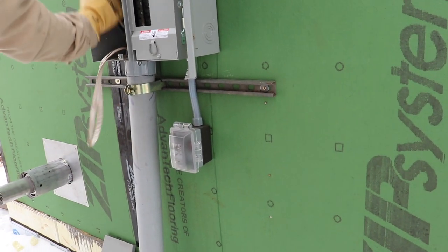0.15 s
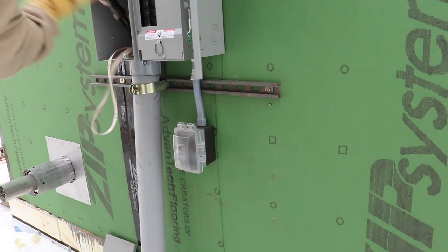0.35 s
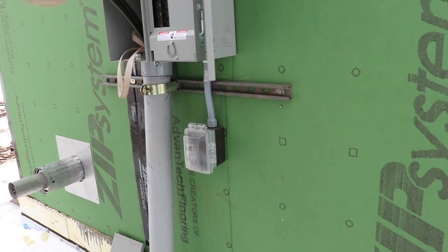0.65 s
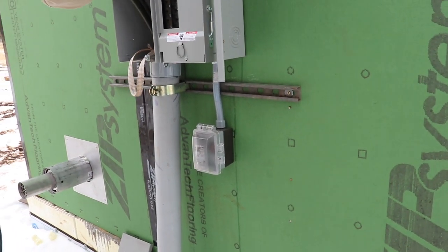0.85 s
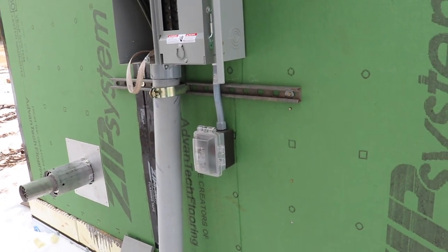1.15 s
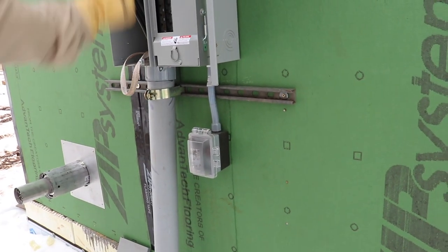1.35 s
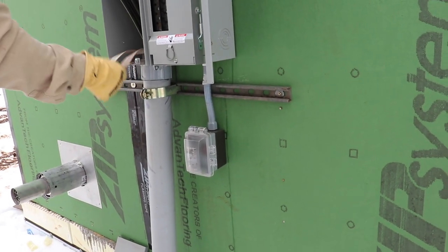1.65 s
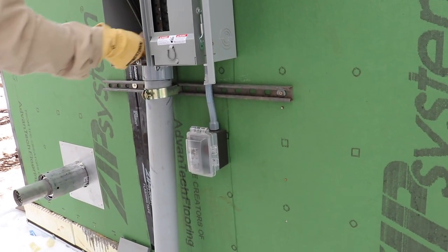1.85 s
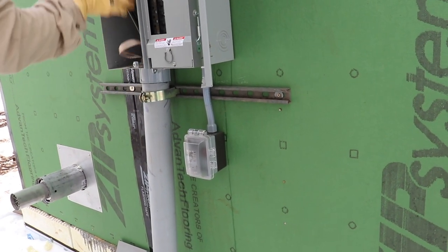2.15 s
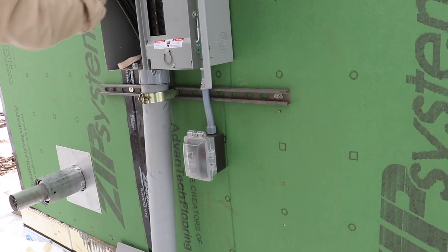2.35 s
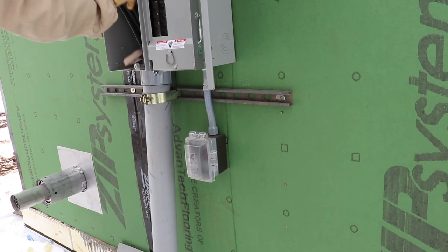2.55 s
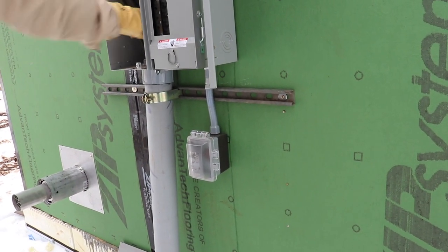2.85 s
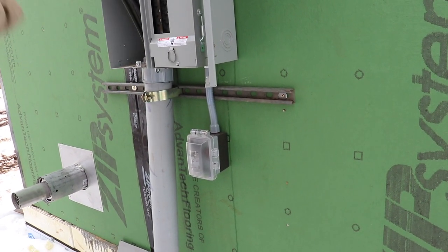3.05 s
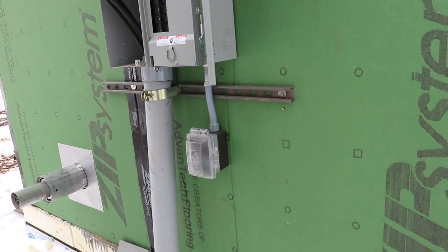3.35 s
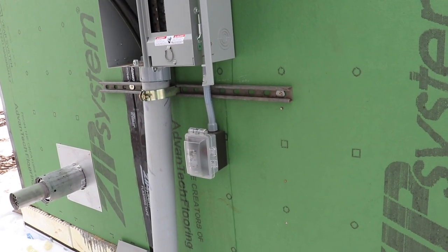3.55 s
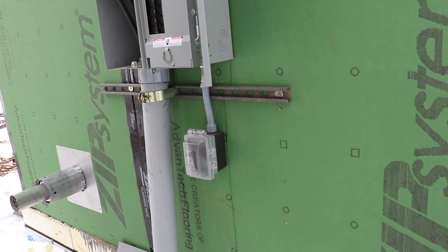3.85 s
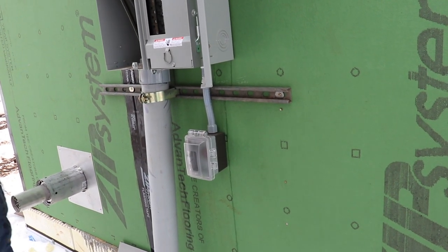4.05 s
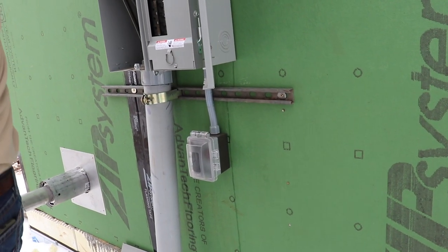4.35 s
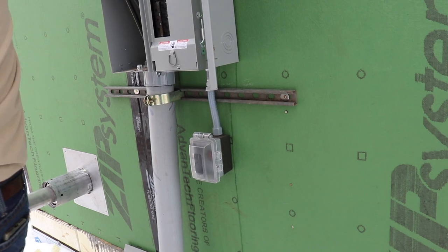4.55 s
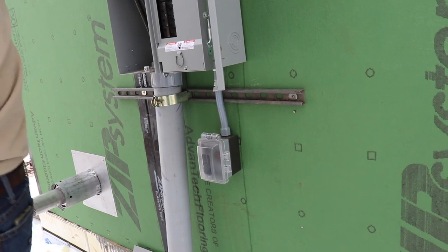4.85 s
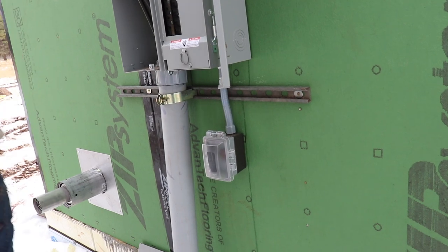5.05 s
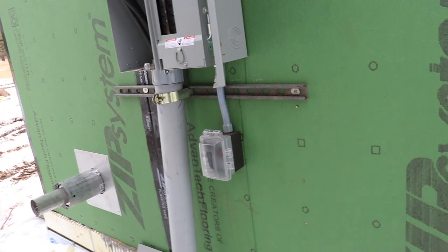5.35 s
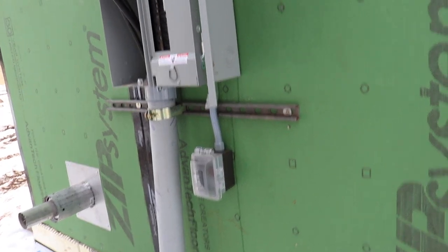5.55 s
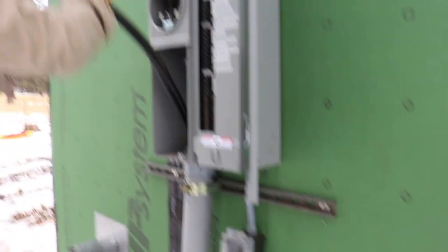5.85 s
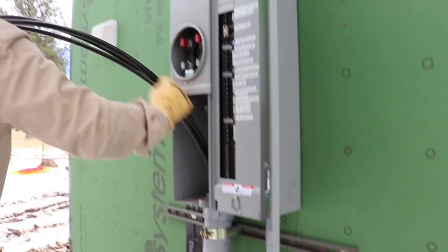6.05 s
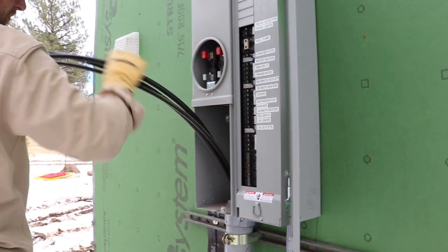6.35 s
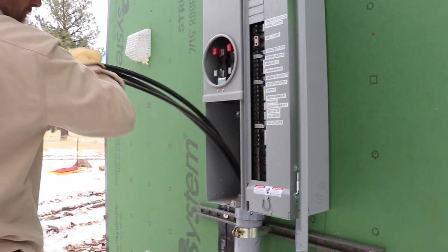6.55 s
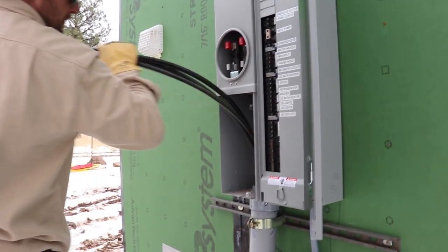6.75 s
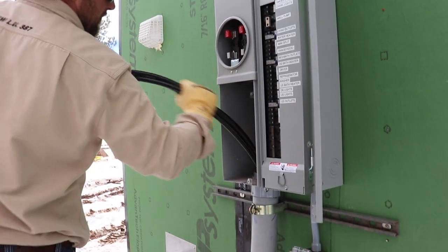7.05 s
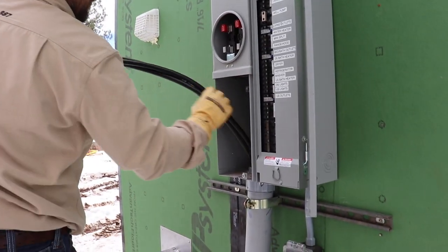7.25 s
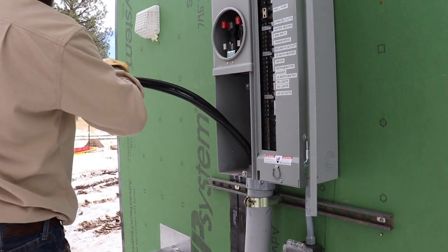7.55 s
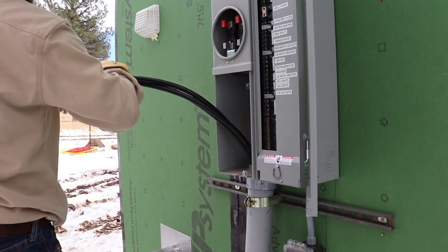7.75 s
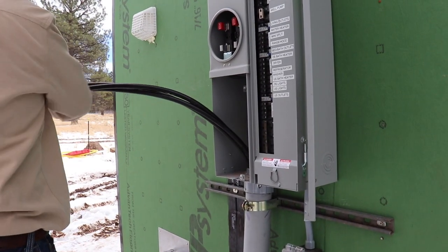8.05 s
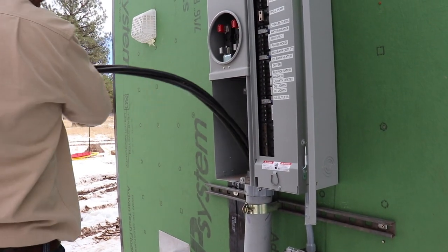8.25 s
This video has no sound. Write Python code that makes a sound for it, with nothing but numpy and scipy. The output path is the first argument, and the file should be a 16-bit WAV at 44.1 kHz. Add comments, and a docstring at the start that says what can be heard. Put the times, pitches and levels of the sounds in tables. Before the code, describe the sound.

Heavy rubbery cables rub inside a pipe and against a thin sheet-metal cabinet, giving gritty scrapes, low booming knocks and rattly, briefly ringing slaps. Activity comes in bursts: at the start, again after two seconds, a clank at four, muffled footsteps and ticks, then the densest pulling from about six seconds. One nearby microphone outdoors, faint wavering air behind.

```python
"""Outdoors at a steel meter box, one microphone: a worker draws thick cables up a conduit, hand over hand.
The cables judder and scrape in the pipe (trains of tiny friction slips), bump it and slap the box,
whose panels colour, echo and ring. Sharp taps and brief panel pings stand out; sleeves rustle (shaped
noise) and boots scuff the frozen ground in muffled grains, over quiet, wavering outdoor air."""
import sys
import numpy as np
from scipy import signal
from scipy.fft import rfft, irfft
from scipy.io import wavfile
from scipy.ndimage import uniform_filter1d, map_coordinates

SR = 44100
rng = np.random.default_rng(int(sys.argv[2]) if len(sys.argv) > 2 else 0)


def wav_record(signal):
    """Record a signal, one row per channel, as 16-bit PCM in the file named by sys.argv[1]."""
    frames = np.transpose(np.atleast_2d(signal))
    bounded = np.clip(frames, -1, 1)
    # unit amplitude maps onto the largest positive 16-bit level
    quanta = np.round(bounded * 32767).astype(np.int16)
    wavfile.write(sys.argv[1], SR, quanta)


N = 369999  # length in samples

# hollow rumble of the conduit: frequency_hz [Hz], relative level_db [dB per Hz]
PIPE_COLOUR = [(29, -35), (50, -6), (64, -27.5), (118, -6.5), (151, -7), (188, -1.5), (232, 2.5),
               (268, -7.5), (399, -8.5), (549, -18.5), (700, -19), (910, -46), (1540, -120)]


def amp(db):
    """Amplitude factor of a level in dB."""
    return 10 ** (np.asarray(db) / 20)


def unit(x):
    """x scaled to an RMS of 1."""
    return x / np.sqrt(np.mean(x ** 2) + 1e-20)


def along(points, hz):
    """Values between (Hz, value) points, read on a log frequency axis."""
    point_hz, values = np.transpose(points)
    return np.interp(np.log(hz + 1), np.log(point_hz + 1), values)


def wobble(rate):
    """A smooth random curve, rate knots a second."""
    knots = rng.standard_normal(int(N * rate / SR) + 4)
    return map_coordinates(knots, [np.arange(N) * rate / SR])


def response(colour, size=8192):
    """Causal (minimum-phase) impulse response of energy 1 for a colour, dB as a function of Hz."""
    cepstrum = irfft(np.log(amp(colour(np.fft.rfftfreq(size, 1 / SR))) + 1e-6))
    # folding the cepstrum forward puts the energy as early as possible
    cepstrum[1:size // 2] *= 2
    cepstrum[size // 2 + 1:] = 0
    ir = irfft(np.exp(rfft(cepstrum)))[:size // 2]
    return ir / np.linalg.norm(ir)


def through(x, ir):
    """x heard through an impulse response."""
    return signal.fftconvolve(x, ir)[:len(x)]


def butter(x, edge_hz, kind, order):
    """A gentle causal filter."""
    return signal.sosfilt(signal.butter(order, edge_hz, kind, fs=SR, output="sos"), x)


def dull(hz, corner_hz, sharpness):
    """A springy contact: sharpness sets its gain at the corner; 12 dB an octave are lost well above."""
    ratio = hz / corner_hz
    return -10 * np.log10((1 - ratio ** 2) ** 2 + (ratio / sharpness) ** 2)


def slips(rate, spread_db, smooth, size=N):
    """Friction: tiny slips of uneven size, rate a second, over a share of smooth hiss."""
    sizes = amp(spread_db * np.clip(rng.standard_normal(size), -2, 2)) * rng.choice([-1, 1], size)
    happens = rng.random(size) < rate / SR
    return unit(unit(sizes * happens) + smooth * rng.standard_normal(size))


def swell(rise, fall):
    """Force of one contact: it builds up in rise seconds, then dies away with time constant fall."""
    t = np.arange(SR // 2) / SR
    return np.minimum(t / rise, 1) * np.exp(-np.maximum(t - rise, 0) / fall)


def even(x, size=600):
    """Noise with its chance swells taken out, so that a short blow keeps its strength."""
    power = np.abs(uniform_filter1d(x ** 2, size))
    return x / np.sqrt(power + 1e-12)


def add(track, s, sound):
    """Lay a sound into a track at time s."""
    part = track[round(s * SR):][:len(sound)]
    part += sound[:len(part)]


def pulls():
    """Each tug gathers speed, holds and dies away: it scrapes the box rim and judders in the pipe."""
    # tugs that slide the cables up the pipe: start_s [s], rise_s [s], hold_s [s], fall_s [s],
    # relative scrape_db [dB], relative judder_db [dB], brightness_db [dB, treble against body of the scrape]
    tugs = [(0.208, 0.01, .11, 0.029, -37, -35, -12), (0.359, 0.079, 0.057, 0.024, -53, -39.5, 3),
            (0.501, 0.029, .16, 0.066, -35.5, -32, -5.5), (2.432, 0.011, .06, 0.043, -49.5, -47.5, -6),
            (2.531, 0.025, 0.12, 0.077, -31.5, -49.5, -6.5), (2.739, 0.045, 0.099, 0.042, -29.5, -55, 3),
            (2.9, 0.028, 0.029, 0.085, -42, -36.5, -17), (5.79, .05, 0.023, .03, -38, -36, 6.5),
            (5.894, 0.024, 0.097, 0.09, -40.5, -34, 6.5), (6.273, 0.035, 0.096, 0.066, -33.5, -37, 2.5),
            (6.545, 0.034, 0.032, 0.068, -45, -40.5, 0.5), (6.956, 0.026, 0.31, 0.021, -41, -40.5, 6),
            (7.25, 0.12, 0.084, 0.087, -31, -33, 3.5), (8.216, 0.034, 0.065, 0.055, -48, -47.5, -20)]
    grip_per_s = 22  # knots a second
    t = np.arange(N) / SR
    judder, scrape, edge = np.zeros((3, N))
    grip = amp(1.05 * wobble(grip_per_s))  # the cable jacket catches and lets go
    for s, rise, hold, fall, scrape_db, judder_db, bright_db in tugs:
        dying = np.exp(-np.maximum(t - s - rise - hold, 0) / fall)
        speed = grip * np.clip((t - s) / rise, 0, 1) * dying
        judder += speed * amp(judder_db)
        scrape += speed * amp(scrape_db)
        edge += speed * amp(scrape_db + bright_db)

    friction = slips(rate=1800, spread_db=4.5, smooth=0.61)
    grit = butter(friction * amp(3.24 * wobble(60)), 420, "high", order=2)
    # the jacket rasps in a band that climbs as it is dragged harder
    hard = np.clip(scrape / amp(-28.0), 0, 1) ** 2
    low_rasp = butter(grit, [950, 1300], "band", order=1)
    high_rasp = butter(grit, [1400, 2300], "band", order=1)
    rasp = (1 - hard) * low_rasp + hard * high_rasp
    soft = butter(grit, 1740, "low", order=1)
    body = amp(-2.5) * soft + amp(-6.5) * rasp
    force = scrape * body + amp(-0.5) * edge * (grit - soft)

    pipe = response(lambda hz: along(PIPE_COLOUR, hz))
    rumble = unit(through(slips(rate=380, spread_db=1.5, smooth=0.42), pipe))
    unsteady = amp(1.5 + 1.0 * wobble(grip_per_s))
    return force, unsteady * judder * rumble


def bumps():
    """The heavy cable knocks the pipe, which booms briefly."""
    # dull bumps of the cable against the pipe: start_s [s], level_db [dB], fall_s [s]
    knocks = [(.204, -31, .012), (.289, -22, 0.014), (.57, -27, 0.013), (1.127, -37, 0.13),
              (1.428, -45, 0.058), (1.982, -36.5, 0.074), (2.855, -36.5, 0.016), (3.123, -35, .012),
              (3.205, -27.5, 0.023), (3.419, -28, 0.035), (3.489, -42, 0.062), (3.6, -47, 0.066),
              (3.993, -28, 0.09), (4.187, -33.5, 0.014), (5.626, -31, 0.015), (5.918, -28, 0.0048),
              (6.115, -21.5, 0.027), (6.734, -38.5, 0.047), (6.932, -16.5, .011), (7.273, -23.5, 0.036),
              (7.407, -18, 0.0071)]
    out = np.zeros(N)
    pipe = response(lambda hz: along(PIPE_COLOUR, hz))
    for s, db, fall in knocks:
        push = swell(0.003, fall)
        noise = rng.standard_normal(len(push) + len(pipe) - 1)
        boom = even(signal.fftconvolve(noise, pipe, "valid"))
        add(out, s, amp(db) * push * boom)
    return out


def slaps():
    """The stiff cables chatter briefly against the steel, each slap with its own brightness."""
    # cable slaps on the box: start_s [s], relative level_db [dB], rise_s [s], fall_s [s],
    # brightness_db [dB per octave, flattening below 1500 Hz]
    blows = [(1.121, -9.5, 0.017, 0.026, -3), (1.204, -18, 0.006, 0.049, -3),
             (1.974, -23.5, 0.011, 0.027, -2.5), (2.54, -23, 0.0016, 0.034, -18),
             (3.21, -38.5, .003, 0.028, -0.5), (3.25, -33, .004, 0.0023, 5),
             (3.418, -31.5, 0.0045, 0.026, -5.5), (3.985, -11.5, .02, 0.012, 0),
             (5.676, -22, 0.0048, .031, 0), (6.113, -22, 0.0041, 0.029, 2.5),
             (6.162, -11, 0.0041, 0.025, 1), (6.2, -8, 0.0094, 0.0093, -9.5), (6.84, -15, .012, .052, 0),
             (6.923, -21, 0.0037, 0.037, 0), (7.221, -23.5, 0.0029, 0.0064, 2.5),
             (7.545, -20, 0.0045, 0.02, -6.5)]
    force = np.zeros(N)
    for s, db, rise, fall, bright_db in blows:
        push = swell(rise, fall)
        touching = np.arange(len(push)) < rise * SR
        push = np.maximum(push, amp(-6.5) * touching)  # the first touch is abrupt
        chatter = slips(rate=4000, spread_db=1.5, smooth=0.57, size=len(push))
        octaves = np.log2(1 + np.minimum(np.fft.rfftfreq(len(push), 1 / SR), 9000) / 1500)
        tilt = amp(bright_db * (octaves - 0.3))
        add(force, s, amp(db) * push * irfft(rfft(chatter) * tilt, len(push)))
    return butter(force, 430, "high", order=1)


def box(force, tail, ring_db, flutter_db):
    """Steel panels: broad resonances, quick echoes inside the box, then the ringing tail."""
    # colour of the steel box: frequency_hz [Hz], relative level_db [dB per Hz]
    steel_colour = [(60, -7), (130, -4), (250, -9.5), (550, -15), (1000, -7.5), (1600, -17), (2100, -17.5),
                    (3500, -20), (8000, -25), (10000, -33), (13500, -34), (15500, -46)]
    # its broad panel resonances: frequency_hz [Hz], width_hz [Hz], boost_db [dB above that colour]
    resonances = [(197, 34, 13), (302, 131, 6.5), (442, 40, 4.5), (509, 69, 7), (610, 100, 5), (778, 89, 9),
                  (900, 99, 0.5), (1012, 82, 7.5), (1190, 20, -2), (1278, 83, 5), (1445, 130, 8),
                  (1581, 124, 7.5), (1800, 250, 6.5), (2309, 170, 6.5), (2650, 300, 4), (2930, 270, 4.5),
                  (3400, 120, 1), (3548, 37, 12), (3890, 160, 4), (4660, 200, 3), (4870, 590, 2),
                  (5920, 65, -0.5), (7225, 64, 9), (8100, 480, 5)]

    def colour(hz):
        peaks = sum(db / (1 + (2 * (hz - f) / width) ** 2) for f, width, db in resonances)
        return along(steel_colour, hz) + peaks

    panels = response(colour)
    out = through(force, panels) + amp(ring_db) * through(force, through(tail, panels))
    # the echo pattern shifts as the contact point wanders
    place = 2 * np.pi * np.arange(N) / SR + wobble(3)
    for share in (np.cos(place), np.sin(place)):
        fading = np.exp(-np.arange(len(tail)) / SR / 0.0062)
        inside = rng.standard_normal(len(tail)) * fading
        inside = butter(inside / np.linalg.norm(inside), 850, "high", order=1)
        out += amp(flutter_db) * through(force * share, through(inside, panels))
    return out


def ring(clear_db, spread_db, count=520):
    """Free ringing of sheet steel: a few clear modes among hundreds of weaker, evenly crowded ones."""
    # how long the panels ring: frequency_hz [Hz], t60_s [s to fall by 60 dB]
    ring_times = [(150, 0.87), (400, 0.51), (1500, 0.45), (4000, 0.36), (8000, 0.087), (15000, 0.16)]
    # the clearest long-ringing modes of the box: frequency_hz [Hz], relative level_db [dB]
    clear_modes = [(323, -1.5), (506, -4), (673, -1.5), (1043, -14), (1443, -13), (1499, -4), (1590, -1.5),
                   (1798, -3), (2226, 4), (2303, 5.5), (2649, -3.5), (2853, -14), (3401, -5), (3590, -10),
                   (3811, 5), (4226, -3), (4447, -3), (4969, -9), (5017, 4), (5106, -3), (5523, -2),
                   (5741, -15), (5879, 4), (6112, 2)]
    t = np.arange(SR * 3 // 4) / SR
    fine_hz = 300 + 14500 * (np.arange(count) + rng.random(count)) / count
    fine_gain = amp(spread_db * np.clip(rng.standard_normal(count), -2, 2))

    def decay(hz):  # time constant in seconds
        return along(ring_times, hz) / np.log(1000)

    def mode(hz, phase):
        return np.cos((2 * np.pi * hz * t + phase).astype("f")) * np.exp((-t / decay(hz)).astype("f"))

    fine = sum(gain * mode(hz, 2 * np.pi * rng.random()) for hz, gain in zip(fine_hz, fine_gain))
    # a mode that rings longer starts lower
    clear = sum(amp(clear_db + db) * 2 / (decay(hz) * SR) * mode(hz, 0) for hz, db in clear_modes)
    return fine / np.linalg.norm(fine) + clear


def pings(waver=0.021):
    """Brief pings: a contact sets one panel resonance ringing, its pitch slightly unsteady."""
    # short pings of the panels: start_s [s], level_db [dB], pitch_hz [Hz], fall_s [s]
    panel_pings = [(.213, -37.5, 1034, 0.031), (.548, -39.5, 1062, 0.083), (2.775, -32, 1014, 0.017),
                   (3.991, -20, 1497, 0.026)]
    out = np.zeros(N)
    for s, db, hz, fall in panel_pings:
        push = swell(0.014, fall)
        pitch_hz = hz * (1 + waver * wobble(315)[:len(push)])
        phase = 2 * np.pi * np.cumsum(pitch_hz) / SR
        add(out, s, amp(db) * push * unit(np.sin(phase)))
    return out


def taps(rattle):
    """One sharp push followed by a very short rattle; the springy contact takes off treble and bass."""
    # short taps and snaps: start_s [s], peak_db [dB], dull_above_hz [Hz], fall_s [s]
    snaps = [(.456, -28.5, 910, 0.021), (0.591, -15, 3300, .002), (.947, -27, 785, .005),
             (2.12, -37, 12100, .0027), (2.338, -37, 1620, 0.017), (3.124, -34.5, 810, .017),
             (3.996, -9.5, 10900, .018), (4.387, -27.5, 1000, 0.0035), (4.937, -12, 2160, 0.0035),
             (5.001, -16.5, 900, 0.0032), (5.036, -20, 1700, 0.0058), (5.246, -22.5, 2380, 0.014),
             (5.299, -32, 8500, 0.021), (5.433, -26, 2220, .006), (5.844, -19, 1380, 0.0019),
             (6.008, -21, 3500, 0.0057), (6.107, -18, 2200, 0.0026), (6.379, -24, 8900, .003),
             (6.457, -20.5, 1210, 0.004), (6.537, -25.5, 2060, 0.016), (6.56, -26.5, 8800, 0.0046),
             (6.735, -27.5, 2130, 0.018), (6.766, -32, 1330, 0.036), (7.165, -18, 2510, 0.012),
             (7.189, -21, 1970, 0.004), (7.2205, -9, 3380, 0.0031), (7.409, -16, 3540, 0.0033),
             (7.571, -20, 10000, 0.0064), (7.622, -27.5, 4000, 0.0042), (7.911, -34, 1560, 0.028)]
    out, t = np.zeros(N), np.arange(SR // 8) / SR
    for s, db, corner_hz, fall in snaps:
        force = rattle * rng.standard_normal(len(t)) * np.exp(-t / fall)
        force[0] = -1  # the sharp push

        def contact(hz):
            body = 2 * dull(hz, corner_hz, sharpness=0.69)
            treble_floor = -32 + dull(hz, 2.9 * corner_hz, sharpness=0.93)
            bass_loss = dull(corner_hz / 6, hz + 1, sharpness=0.88)  # swapped: a low cut
            return np.maximum(body, treble_floor) + bass_loss

        tap = through(force, response(contact))
        add(out, s, amp(db) * tap / np.abs(tap).max())
    return out


def steps():
    """Boots crush the frozen ground in muffled grains."""
    # full footfalls: start_s [s], level_db [dB]
    footfalls = [(4.758, -31.5), (4.957, -35)]
    # each rolls from heel to sole to full weight, ever duller:
    # delay_s [s], level_db [dB on the footfall], rise_s [s], fall_s [s], dull_above_hz [Hz]
    roll = [(0, 0, 0.026, 0.057, 1400), (.043, 4, 0.013, 0.032, 620), (.074, 4, 0.0041, 0.069, 270)]
    # light shuffles of a boot: start_s [s], level_db [dB], fall_s [s], dull_above_hz [Hz]
    scuffs = [(4.314, -38, 0.061, 400), (4.475, -48.5, 0.16, 655), (5.109, -35.5, 0.11, 840),
              (5.159, -34.5, .016, 1470), (5.242, -32, 0.031, 915), (5.297, -29, 0.048, 423),
              (5.43, -34.5, 0.029, 1460), (5.594, -34.5, 0.066, 607)]
    # colour of the ground under a boot: frequency_hz [Hz], relative level_db [dB per Hz]
    ground = [(50, -54), (130, -11), (230, 2.5), (450, 1.5), (1000, 3), (2500, -2.5), (5000, -4),
              (9000, -1), (15000, -31)]
    scuff_rise_s = 0.0025
    out = np.zeros(N)
    contacts = [(s + delay, db + part_db, rise, fall, hz)
                for s, db in footfalls for delay, part_db, rise, fall, hz in roll]
    contacts += [(s, db, scuff_rise_s, fall, hz) for s, db, fall, hz in scuffs]
    for s, db, rise, fall, corner_hz in contacts:
        weight = swell(rise, fall)
        crunch = weight * slips(rate=900, spread_db=0.5, smooth=0.6, size=len(weight))
        muffled = response(lambda hz: along(ground, hz) + dull(hz, corner_hz, sharpness=0.35))
        add(out, s, amp(db) * through(crunch, muffled))
    return out


def sleeves():
    """Canvas rubs on canvas, swelling and fading with each sweep of the arms."""
    # sweeps of an arm or glove: middle_s [s], length_s [s], relative level_db [dB]
    sweeps = [(0.115, 0.029, -55.5), (0.225, 0.05, -50), (.305, 0.04, -45.5), (0.59, 0.11, -47.5),
              (0.662, 0.1, -51), (0.88, 0.42, -58), (2.146, .05, -64.5), (2.348, 0.024, -59),
              (2.647, 0.061, -50), (2.82, 0.23, -51), (3.4, 0.11, -57.5), (3.69, 0.62, -62),
              (4.127, 0.12, -55), (4.368, 0.069, -55.5), (4.787, .06, -62), (5.637, 0.31, -55),
              (5.974, 0.13, -40), (6.393, .1, -69), (6.59, 0.1, -55), (7.073, 0.23, -42.5),
              (7.766, 0.17, -57), (7.972, 0.16, -59.5)]
    # rustle of the cloth: frequency_hz [Hz], relative level_db [dB per Hz]
    cloth = [(300, 10.5), (1200, 2.5), (3000, -2.5), (5500, -4), (8200, -0.5), (10000, -8.5), (13500, -9.5),
             (15500, -17)]
    steepness = 1.11  # how quickly the rustle dies towards a sweep's ends
    t = np.arange(N) / SR
    power = np.zeros(N)
    for s, length, db in sweeps:
        from_middle = np.clip(steepness * 2 * (t - s) / length, -20, 20)
        power += (amp(db) / np.cosh(from_middle)) ** 2
    threads = slips(rate=3000, spread_db=3, smooth=0.5)
    weave = through(threads, response(lambda hz: along(cloth, hz)))
    return np.sqrt(power) * amp(6 + 2.85 * wobble(38)) * unit(weave)


def air():
    """A quiet, slowly wavering outdoor background of coloured noise."""
    # still outdoor air: frequency_hz [Hz], relative level_db [dB per Hz]
    air_colour = [(10, -5.5), (20, 0.5), (36, -9), (64, -25.5), (130, -14.5), (274, -16), (500, -21),
                  (1000, -22), (1500, -26), (3500, -35), (8000, -38.5), (15500, -43.5)]
    hush = through(rng.standard_normal(N), response(lambda hz: along(air_colour, hz)))
    return amp(-53 + 1.2 * wobble(4.1)) * unit(hush)


def scene():
    """Slaps and scrapes sound through the steel box; the other sources are heard directly."""
    scrape, judder = pulls()
    tail = ring(clear_db=16.0, spread_db=1)
    slapped = amp(-2.0) * box(slaps(), tail, ring_db=-10.5, flutter_db=-2.0)
    scraped = amp(-3) * box(scrape, tail, ring_db=-8.5, flutter_db=-0.5)
    cables = slapped + scraped + pings() + judder + bumps()
    return (cables + taps(rattle=0.14) + steps() + sleeves() + air())[None]


def record(dry):
    """The microphone chain passes nothing from its band limit upwards."""
    top_hz = 15800
    return irfft(rfft(dry) * (np.fft.rfftfreq(N, 1 / SR) < top_hz), N)


dry = scene()
out = record(dry)
wav_record(out)
```